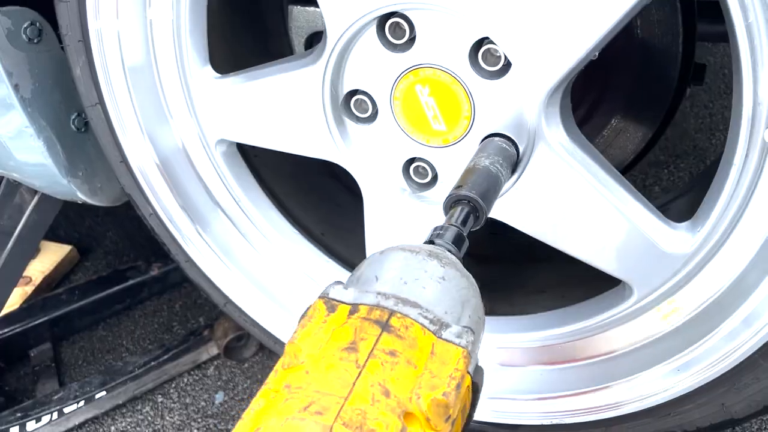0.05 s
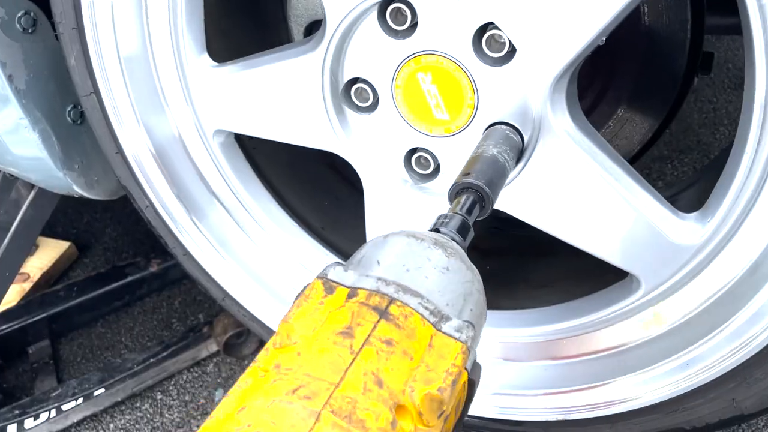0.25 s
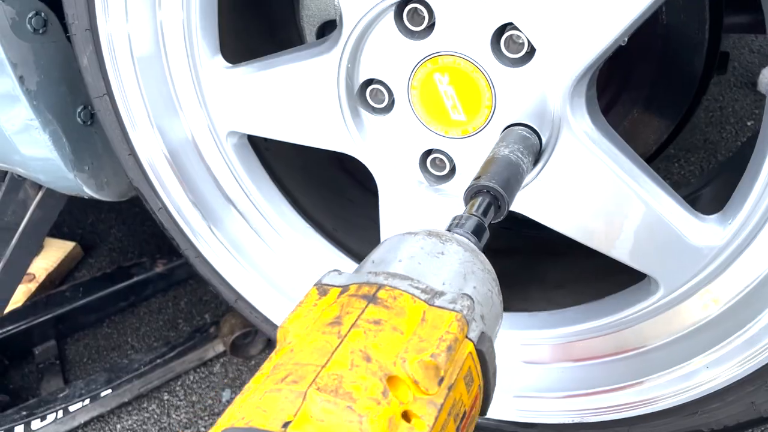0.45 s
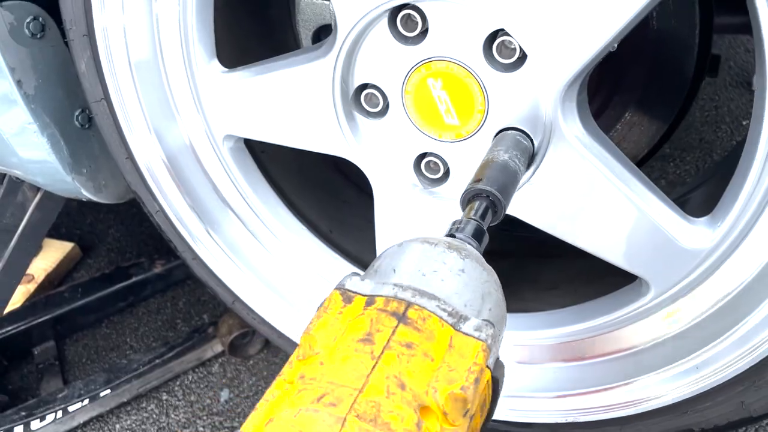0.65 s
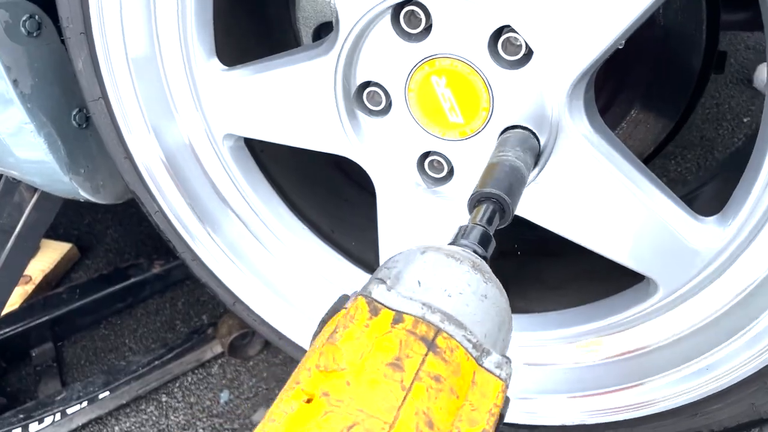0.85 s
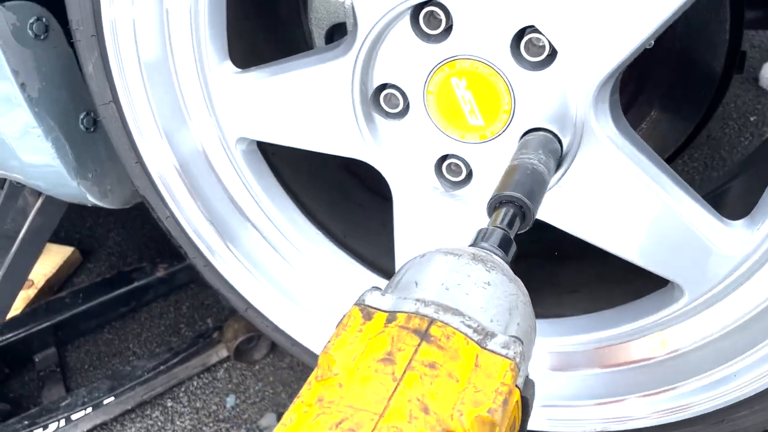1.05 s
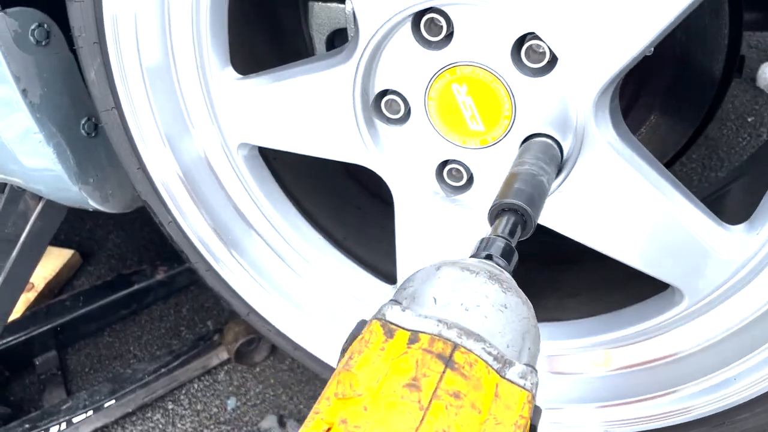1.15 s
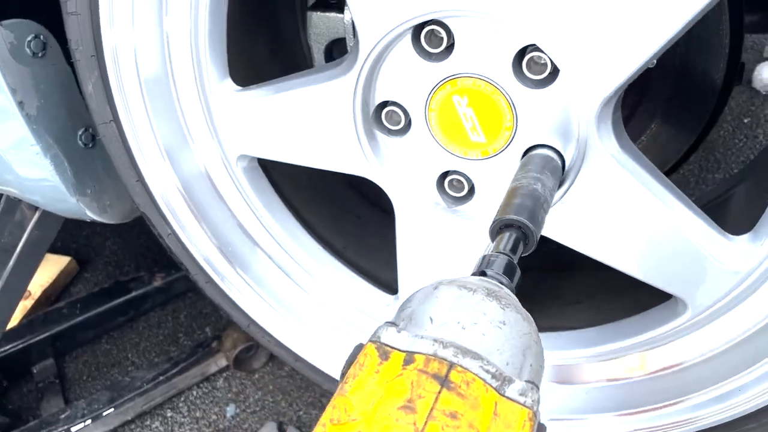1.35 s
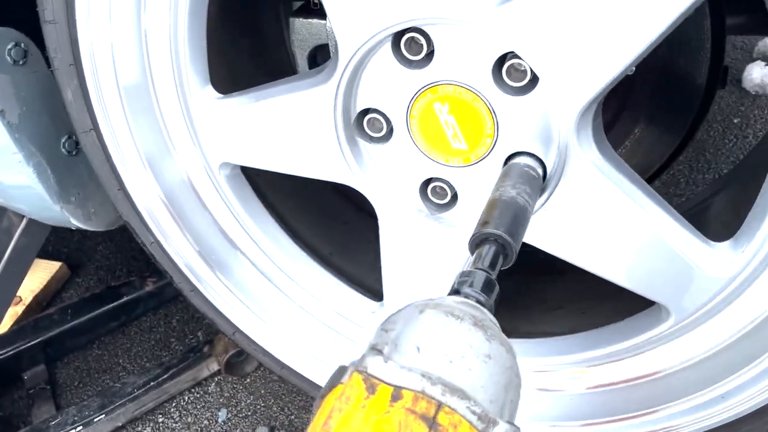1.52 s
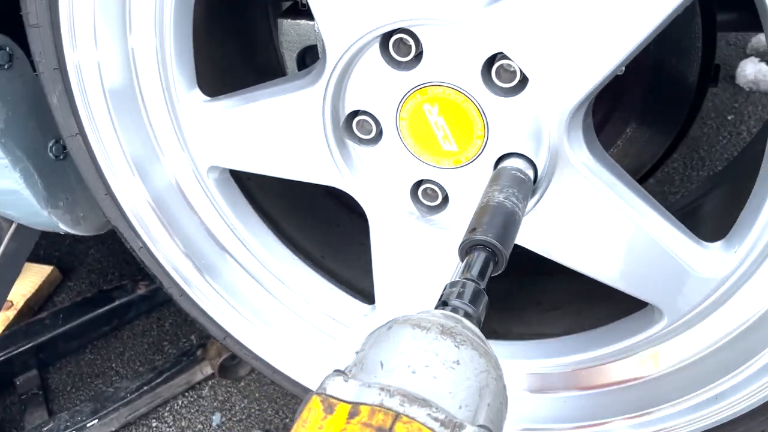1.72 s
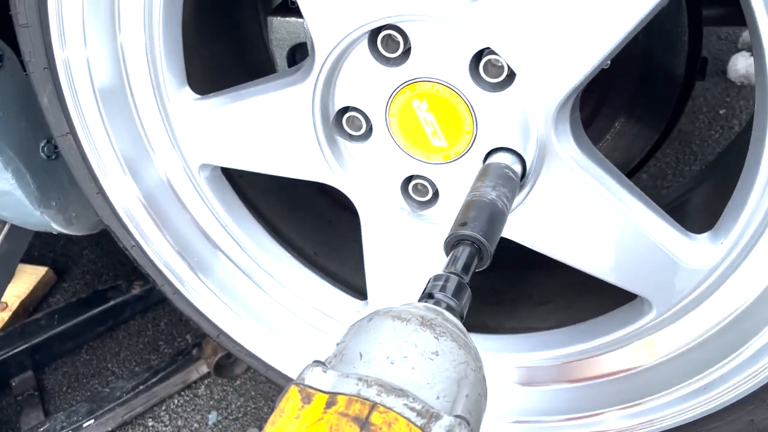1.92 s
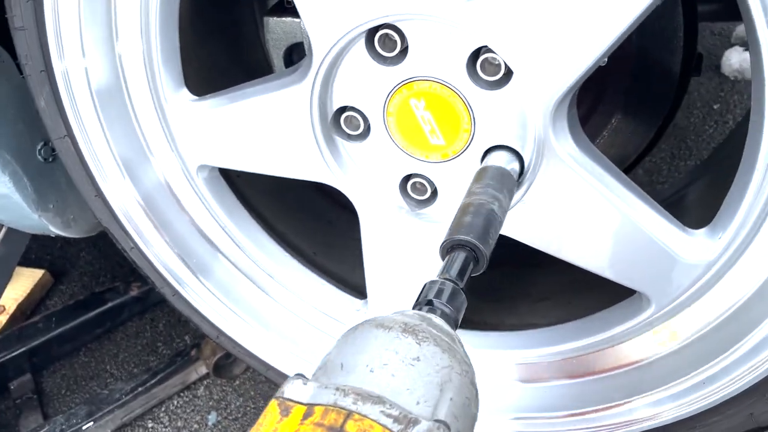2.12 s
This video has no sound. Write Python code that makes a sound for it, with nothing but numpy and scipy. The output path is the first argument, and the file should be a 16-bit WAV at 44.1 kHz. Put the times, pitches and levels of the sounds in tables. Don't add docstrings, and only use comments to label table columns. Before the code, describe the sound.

Loud rattling bursts of a power wrench on a wheel nut, then motor spin-ups and socket knocks.

```python
import sys
import numpy as np
from scipy import signal
from scipy.fft import rfft, irfft, next_fast_len
from scipy.io import wavfile
from scipy.ndimage import uniform_filter1d, map_coordinates

SR = 44100
rng = np.random.default_rng(int(sys.argv[2]) if len(sys.argv) > 2 else 0)


def persist_wave(psi):
    counts = np.round(np.clip(psi, -1, 1) * 32767).astype(np.int16)
    wavfile.write(sys.argv[1], SR, np.atleast_2d(counts).T)


def natural_amplitude(level_db):
    exponent = np.asarray(level_db, float) / 20
    return 10 ** exponent


N = 96005

# (time [s], level [dB])
HAND_SHAKE = [(0, -28.5), (.26, -54), (.32, -60.5), (.5, -50.5), (.75, -37), (1.06, -54), (1.35, -70.5),
              (1.62, -71), (1.78, -61), (1.87, -60), (2.0, -69), (2.09, -50), (2.17, -62.5)]
# (frequency [Hz], level [dB])
SHAKE_COLOUR = [(25, -33.5), (60, -3.5), (150, -0.6), (350, -7), (800, -10), (1500, -58.5)]
# (time [s], level [dB], slowness [times])
MOUNT_JOLTS = [(0.127, -30.5, 0.9), (0.252, -35.5, 0.97), (0.7067, -2.5, 0.85), (0.724, -13.5, 1.6),
               (0.8226, -7.5, 0.88), (0.8552, -11, 1.12), (0.976, -40, 1.57), (1.027, -45, 1.25),
               (1.66, -44, 1.1), (2.072, -46, 0.63), (2.102, -29.5, 0.34), (2.149, -32.5, 0.46),
               (2.168, -35, 0.51)]

# (time [s], effort [dB])
LOADED_EFFORT = [(0, -30.5), (.25, -41.5), (.3, -60), (.55, -53), (.61, -26.5), (.8, -34), (.95, -50),
                 (1.05, -54.5)]
# (time [s], effort [dB])
FREE_EFFORT = [
    [(1.09, -46), (1.16, -48), (1.25, -45.5), (1.275, -54.5), (1.31, -60.5), (1.355, -74)],
    [(1.39, -55.5), (1.43, -50.5), (1.54, -44.5), (1.63, -45.5), (1.72, -48), (1.765, -61.5)],
    [(1.8, -51.5), (1.9, -47), (2.06, -40.5), (2.11, -44.5), (2.17, -47)],
]
# (start [s], end [s], top gear-mesh frequency [Hz], time constant [s])
SPIN_UPS = [
    (1.028, 1.266, 2077, 0.079),
    (1.401, 1.633, 2108, 0.064),
    (1.771, 2.126, 2750, .125),
]
# (multiple of the mesh frequency [times], level against the whirr [dB])
MESH_TONES = [(1, -6), (2.21, -10), (1.55, -11), (1.82, -11), (.47, -11), (1.27, -11), (2.6, -14),
              (.74, -12)]
# (frequency [Hz], level [dB])
WHIRR_COLOUR = [(60, -35.5), (300, -1.5), (1100, -4.5), (2700, -1), (4800, -2.5), (6500, -6.5),
                (10000, -17.5), (16800, -59)]
# (frequency [Hz], width [Hz], level [dB])
WHIRR_PEAKS_AND_DIPS = [(630, 290, -5.5), (1116, 440, 9), (2750, 200, 6), (3800, 150, 4.5), (4740, 300, -12.5)]
# (frequency [Hz], level [dB])
BRUSH_COLOUR = [(3000, -19.5), (6000, -6), (9000, -12.5), (13000, -16), (16800, -48.5)]

# (time [s], peak level [dB])
ANVIL_TICKS = [(0.3027, -26), (0.3265, -28.5), (0.3508, -24.5), (0.375, -25), (0.4011, -21),
               (0.4274, -18.5), (0.4537, -17.5), (0.4799, -15.5), (0.507, -14.5), (0.5308, -13.5)]
# (frequency [Hz], level [dB])
TICK_COLOUR = [(150, -32.5), (380, 4.5), (750, -6), (5500, -4), (9500, -4.5), (13500, -9.5), (15800, -21),
               (16800, -57)]

# (time [s], peak level [dB], ring frequency [Hz], ring T60 [s], ring over crack [dB])
FIRST_BURST = [(0.0024, -8.5, 1500, 0.039, -5.5), (0.0064, -22, 2284, 0.088, 2),
               (0.0198, -5.5, 2640, 0.021, -5.5), (0.048, -3.5, 3700, 0.011, -0.5),
               (0.0515, -10.5, 1460, 0.022, -3.5), (0.0648, -13, 3980, 0.014, -5.5),
               (0.0752, -8, 2650, 0.013, 5.5), (0.0855, -12, 3860, 0.015, -4),
               (0.087, -8, 3500, 0.024, -11.5), (0.1015, -17, 3320, 0.027, 3.5),
               (0.1148, -19.5, 2640, 0.013, 7), (0.1185, -8.5, 2500, 0.014, -13),
               (0.1253, -10.5, 2290, 0.021, -1), (0.1275, -3, 3900, 0.016, -6.5),
               (0.1462, -24, 2780, 0.0074, 10.5), (0.1566, -5.5, 2610, 0.011, 2.5),
               (0.1665, -9.5, 2665, 0.0096, -5.5), (0.169, -10.5, 2700, 0.024, -4),
               (0.1853, -16.5, 2700, 0.024, -6.5), (0.2129, -10, 4030, 0.021, -7),
               (0.229, -21.5, 3400, 0.036, -7), (0.2402, -9.5, 1770, 0.01, -10.5),
               (0.2428, -17.5, 2560, 0.0039, 15), (0.2478, -7.5, 2580, 0.013, 0.5),
               (0.2594, -21.5, 1265, 0.027, -9.5), (0.2784, -39, 3430, 0.026, -1)]
# (time [s], peak [dB], ring [Hz], T60 [s], ring over crack [dB])
SECOND_BURST = [(0.5705, -11.5, 6220, 0.0057, 2.5), (0.574, -12, 2470, 0.0064, -3),
                (0.6005, -18, 2630, 0.0065, -6), (0.6049, -1.5, 2655, 0.0059, 8),
                (0.6206, -9, 2400, 0.0042, 11), (0.6245, -8, 2720, 0.016, -4.5),
                (0.6346, -4, 2900, 0.018, -6.5), (0.64, -1.5, 1510, 0.0079, -6),
                (0.6516, -21, 2560, 0.008, 0.5), (0.6637, -2.5, 2650, 0.011, 1),
                (0.6741, -5.5, 3800, 0.015, -7.5), (0.677, -6.5, 3350, 0.009, 4),
                (0.696, -6, 3980, 0.015, -4), (0.6998, -9.5, 2580, 0.0074, 4.5),
                (0.7045, -3, 4000, 0.012, -2.5), (0.7244, -13.5, 2590, 0.012, -5),
                (0.7285, -11.5, 2590, 0.012, -2.5), (0.7345, -4.5, 3070, 0.014, -6.5),
                (0.7537, -14, 2600, 0.011, -6), (0.7624, -2.5, 1740, 0.016, -13.5),
                (0.7803, -12.5, 2745, 0.0074, 2.5), (0.7839, -12, 2620, 0.015, 4.5),
                (0.7905, -7.5, 4000, 0.011, 2.5), (0.8208, -7, 3950, 0.018, -0.5),
                (0.8463, -21, 4500, 0.006, 1.5), (0.8531, -3.5, 3930, 0.0086, 1.5)]
# (time [s], peak [dB], ring [Hz], T60 [s], ring over crack [dB])
SOCKET_RATTLE = [(0.8905, -16.5, 3390, 0.012, -3.5), (0.8984, -6, 2710, 0.011, -3),
                 (0.9073, -7.5, 2830, 0.016, -5), (0.954, -18.5, 2620, 0.0092, 2.5),
                 (0.964, -38, 4800, 0.006, 14), (0.9724, -9, 2495, 0.018, -7),
                 (0.9882, -10, 1610, 0.01, -17), (1.0102, -49, 3340, 0.0056, -7),
                 (1.0259, -18, 3005, 0.017, -10), (1.291, -43, 1344, 0.02, -7),
                 (1.6418, -27.5, 2690, 0.01, -6), (1.6459, -11, 1480, 0.01, -5),
                 (1.6579, -7, 2500, 0.0065, 3), (1.6602, -13, 2550, 0.007, 8),
                 (1.6703, -13, 1700, 0.012, 2), (1.6918, -36.5, 4300, 0.0063, 6),
                 (1.71, -19, 2720, 0.02, -1.5), (1.7382, -35, 1437, 0.023, -7),
                 (2.0942, -30, 2750, 0.033, -1.5), (2.1146, -21.5, 2620, 0.012, -5.5),
                 (2.1184, -26, 2600, 0.008, -9), (2.144, -29.5, 2780, 0.0092, -2)]
# (frequency [Hz], level [dB], T60 [s])
STEEL_MODES = [(1103, -13, 0.059), (1454, -12.5, 0.067), (2640, 4.5, 0.016), (3860, -0.5, 0.015),
               (11700, -30.5, .01)]
# (frequency [Hz], level [dB])
CRACK_COLOUR = [(150, -6), (700, -13), (1500, -6.5), (3000, -7), (6000, -7.5), (9500, -6.5), (15500, -19),
                (16800, -65)]

# (frequency [Hz], left leads by [radians])
PORT_LEAD = [(0, 0), (860, -.9), (1900, .05), (4500, 1.1), (5300, .5), (9500, 3.1), (13000, 4.7),
             (14300, 6.28)]
# (frequency [Hz], left over right [dB])
PORT_TILT = [(300, 0), (800, 4), (1300, -2), (2300, .5), (3100, -4), (4000, 1), (4700, -3), (5400, 0)]
# (frequency [Hz], level [dB])
REFLECTION_COLOUR = [(300, -21), (600, -0.5), (1500, -16.5), (3400, -2), (5000, -20.5), (6500, -5),
                     (11500, -17.5), (14500, -16)]


def unit(x):
    return x / np.sqrt(np.mean(x ** 2) + 1e-20)


def along(points, hz):
    f, v = np.transpose(points)
    return np.interp(np.log(hz + 1), np.log(f + 1), v)


def curve(rows):
    return np.interp(np.arange(N) / SR, *np.transpose(rows))


def wobble(rate):
    knots = rng.standard_normal(int(N * rate / SR) + 4)
    return map_coordinates(knots, [np.arange(N) * rate / SR])


def filtered(x, response):
    m = next_fast_len(x.shape[-1] + 4096)
    spectrum = rfft(x, m) * response(np.fft.rfftfreq(m, 1 / SR))
    return irfft(spectrum, m)[..., :x.shape[-1]]


def dulled(x, corner_hz):
    return filtered(x, lambda hz: 1 / (1 + (hz / corner_hz) ** 4))


def noise(count, colour, bright_db=0):
    def gain(hz):
        octaves = np.clip(np.log2((hz + 1) / 4000), 0, None)
        return natural_amplitude(along(colour, hz) + bright_db * octaves)
    return unit(filtered(rng.standard_normal(count), gain))


def handling():
    shaking = unit(natural_amplitude(6.3 * wobble(30.3)) * noise(N, SHAKE_COLOUR))
    out = np.pad(natural_amplitude(curve(HAND_SHAKE)) * shaking, (0, SR))
    start_hz, end_hz, fall_s = 624, 54.4, 0.00307
    t60, rise_s = 0.095, 0.0042
    for s, db, slow in MOUNT_JOLTS:
        t = np.arange(SR // 5) / SR / slow
        turns = end_hz * t + start_hz * fall_s * (1 - np.exp(-t / fall_s))
        level = natural_amplitude(db - 60 * t / t60) * (1 - np.exp(-t / rise_s))
        out[round(s * SR):][:len(t)] += level * np.sin(2 * np.pi * turns)
    return out[:N]


def whirr_gain(hz):
    return natural_amplitude(sum(db / (1 + (2 * (hz - centre) / width) ** 2) for centre, width, db in WHIRR_PEAKS_AND_DIPS))


def spin_up(start, end, top_hz, tau_s, grit):
    t = np.arange(N) / SR
    speed = 1 - np.exp(-np.clip(t - start, 0, None) / tau_s)
    mesh_hz = top_hz * speed * (1 + 0.019 * wobble(90))
    mesh_turns = np.cumsum(mesh_hz) / SR
    sound = natural_amplitude(-2.5) * grit * noise(N, BRUSH_COLOUR)
    for multiple, db in MESH_TONES:
        sound = sound + natural_amplitude(db + 5.5 * wobble(45)) * np.sin(2 * np.pi * multiple * mesh_turns)
    fade = np.clip(np.minimum(t - start - .03, end - t) / 0.095, 0, 1)
    return fade * sound


def motor():
    grit = natural_amplitude(0.88 * wobble(90) + 1.2 * wobble(500))
    sound = unit(filtered(grit * noise(N, WHIRR_COLOUR), whirr_gain))
    for row in SPIN_UPS:
        sound = sound + spin_up(*row, grit)
    effort_db = curve(sum(FREE_EFFORT, LOADED_EFFORT))
    body = dulled(sound, 4000)
    treble_db = .3 * np.minimum(effort_db + 46, 0)
    return natural_amplitude(effort_db) * (body + natural_amplitude(treble_db) * (sound - body))


def drifting_tone(hz, t):
    start_phase = 2 * np.pi * rng.random()
    steps = uniform_filter1d(rng.standard_normal(len(t)), size=40)
    return np.sin(2 * np.pi * hz * t + start_phase + np.cumsum(steps) * .11)


def blow(t, db, hz, t60, ring_db, colour):
    fall_db = -60 * (t / max(t60, .004)) ** 1.51
    chatter = natural_amplitude(3 * map_coordinates(rng.standard_normal(200), [t * 900]))
    ring = natural_amplitude(-3 + ring_db + fall_db) * drifting_tone(hz, t)
    modes = sum(natural_amplitude(-12 + level + rng.normal(0, 1.2) - 60 * t / life) * drifting_tone(f, t)
                for f, level, life in STEEL_MODES)
    snap = natural_amplitude(-2 - 60 * t / 0.003)
    bright_db = 0.13 * max(db + 10.5, -14)
    crack = noise(len(t), colour, bright_db) * (natural_amplitude(-6.5 + fall_db) * chatter + snap)
    after = noise(len(t), CRACK_COLOUR, -14.5) * natural_amplitude(-24 - 60 * t / 0.11)
    shimmer = noise(len(t), colour, -8) * natural_amplitude(-27.5 - 60 * t / 0.069)
    return natural_amplitude(db) * (ring + modes + crack + after + shimmer)


def blows(rows, rise_s, colour):
    out, t = np.zeros(N + SR), np.arange(SR // 8) / SR
    onset = 1 - np.exp(-(t / rise_s) ** 2)
    for s, db, hz, t60, ring_db in rows:
        out[round(s * SR):][:len(t)] += blow(t, db, hz, t60, ring_db, colour) * onset
    return out[:N]


def anvil_ticks():
    hz, ring_db = 5820, -6.5
    scuffs = [(s - 0.002, db - 9, hz, 0.025, ring_db) for s, db in ANVIL_TICKS]
    clicks = [(s + 0.0004, db - 5.5, hz, 0.01, ring_db) for s, db in ANVIL_TICKS]
    return dulled(blows(scuffs, 0.0027, TICK_COLOUR), 7000) + blows(clicks, .0006, TICK_COLOUR)


def hammer_and_socket():
    return blows([*FIRST_BURST, *SECOND_BURST, *SOCKET_RATTLE], .0006, CRACK_COLOUR)


def ports(x):
    side = np.array([[.5], [-.5]])

    def port_response(hz):
        lead = np.interp(hz, *np.transpose(PORT_LEAD))
        return natural_amplitude(side * along(PORT_TILT, hz)) * np.exp(1j * side * lead)

    def reflection(hz):
        delay_s = .002
        return natural_amplitude(along(REFLECTION_COLOUR, hz)) * np.exp(-2j * np.pi * hz * delay_s)

    direct = filtered(x, port_response)
    z = signal.stft(filtered(x, reflection), nperseg=128)[2]
    phase = 9 * rng.standard_normal((2, *z.shape))
    phase = uniform_filter1d(phase, size=2, axis=1)
    phase = uniform_filter1d(phase, size=10, axis=2)
    reflected = signal.istft(z * np.exp(2j * phase), nperseg=128)[1][:, :N]
    return direct + reflected


def scene():
    knocks = hammer_and_socket() + anvil_ticks()
    knocks = filtered(knocks, lambda hz: 1 / (1 + (280 / (hz + 1)) ** 4))
    return ports(knocks + motor()) + handling()


def band_limit(x):
    return signal.sosfilt(signal.butter(12, 16990, fs=SR, output="sos"), x)


def record(dry):
    limited = dry / np.sqrt(np.sqrt(1 + (dry / .93) ** 4))
    mix = filtered(limited, lambda hz: 1 / (1 + (hz / 16300) ** 60))
    return band_limit(mix)


dry = scene()
out = record(dry)
persist_wave(out)
```